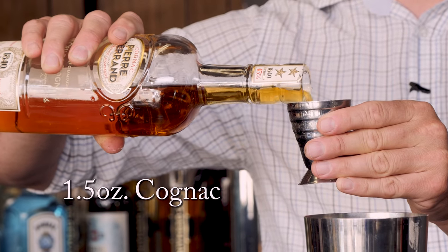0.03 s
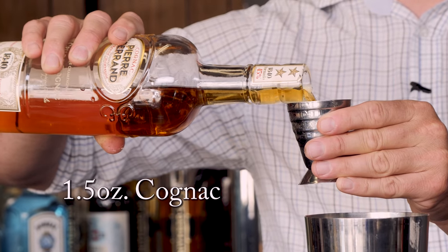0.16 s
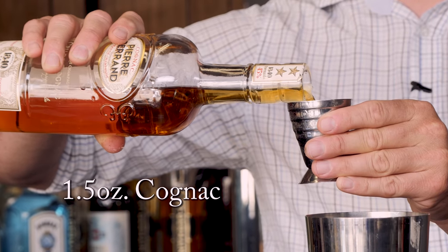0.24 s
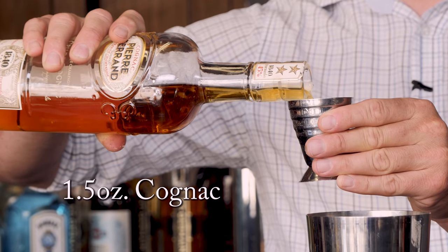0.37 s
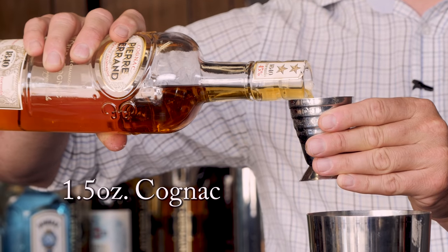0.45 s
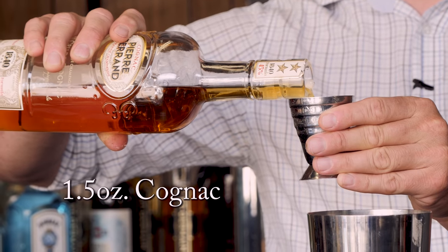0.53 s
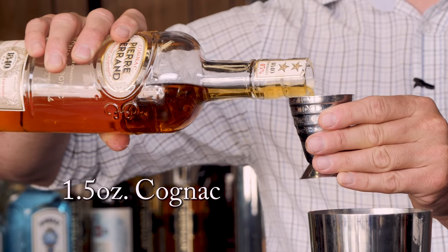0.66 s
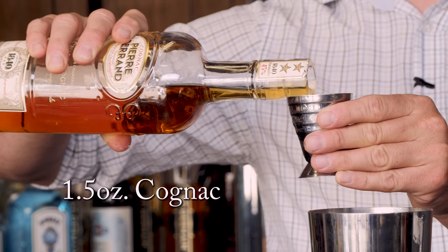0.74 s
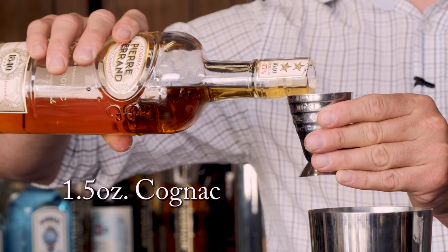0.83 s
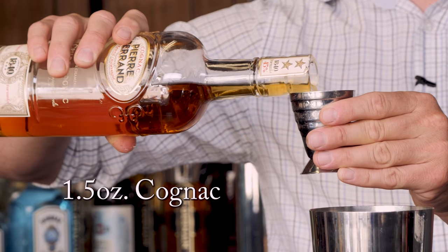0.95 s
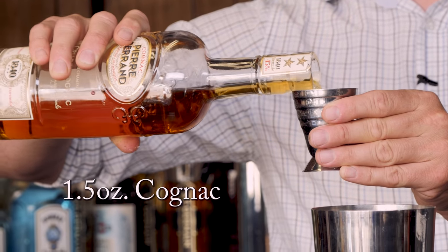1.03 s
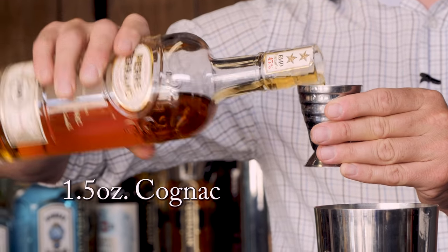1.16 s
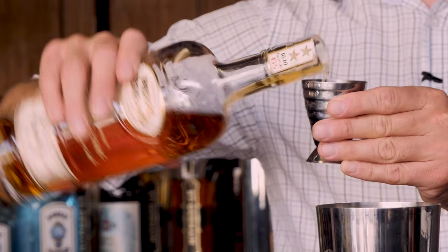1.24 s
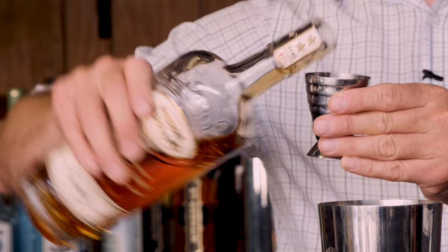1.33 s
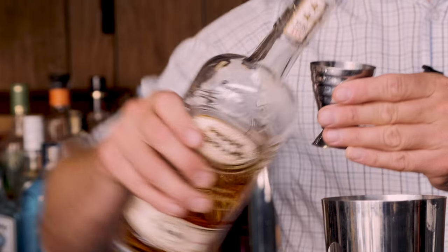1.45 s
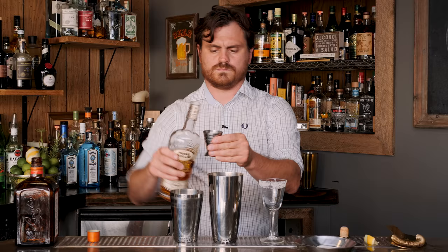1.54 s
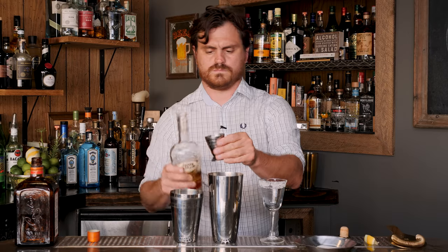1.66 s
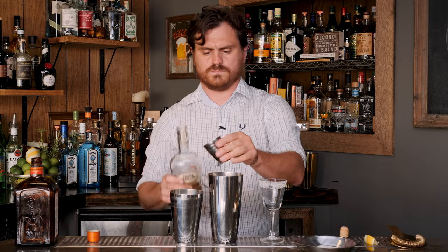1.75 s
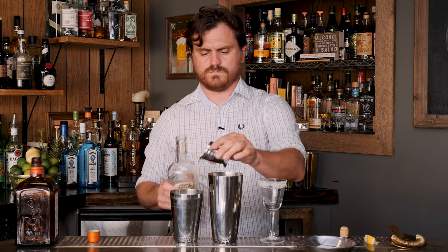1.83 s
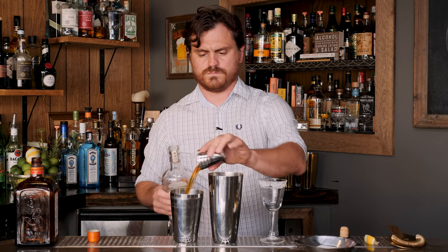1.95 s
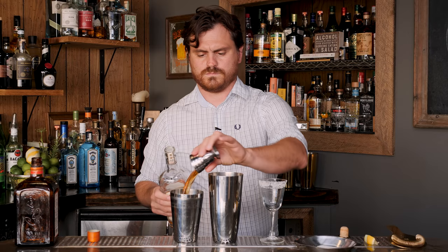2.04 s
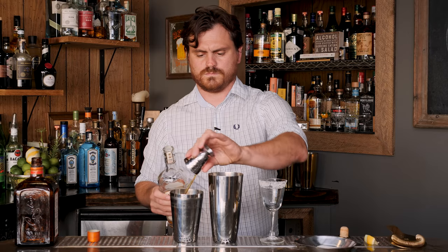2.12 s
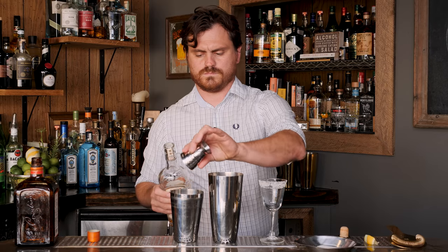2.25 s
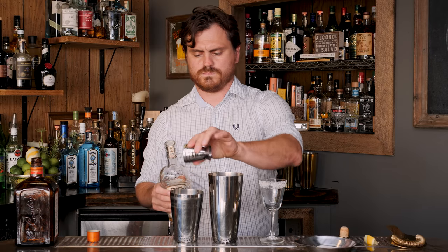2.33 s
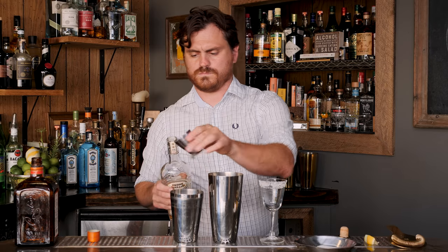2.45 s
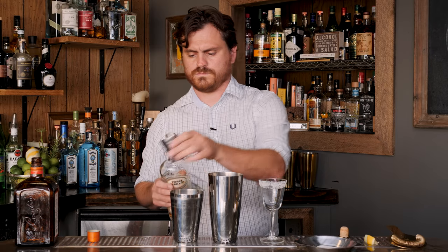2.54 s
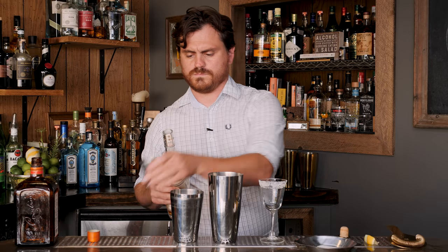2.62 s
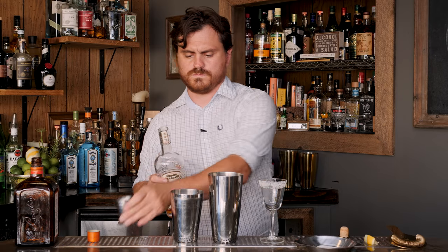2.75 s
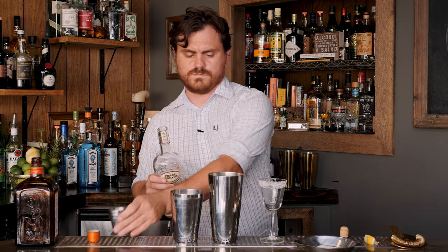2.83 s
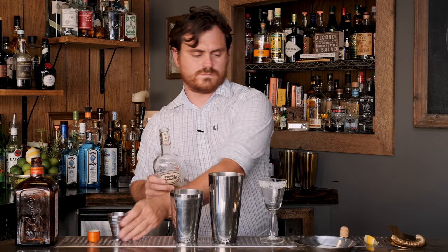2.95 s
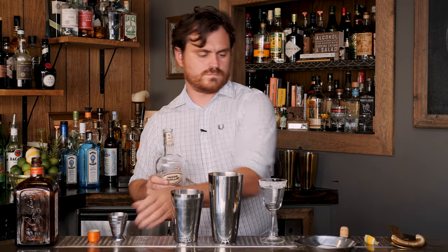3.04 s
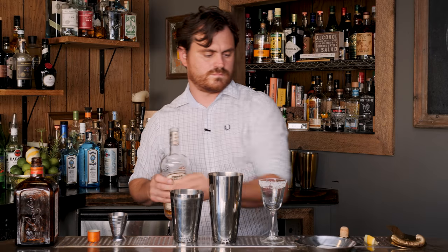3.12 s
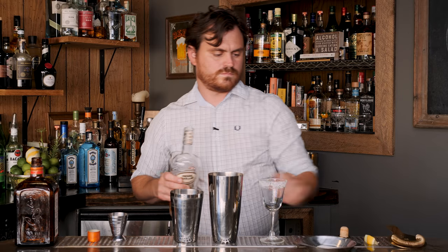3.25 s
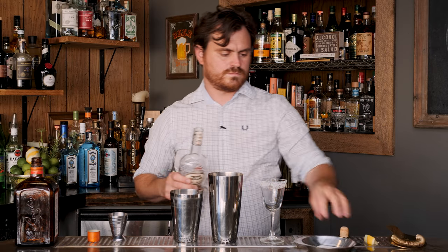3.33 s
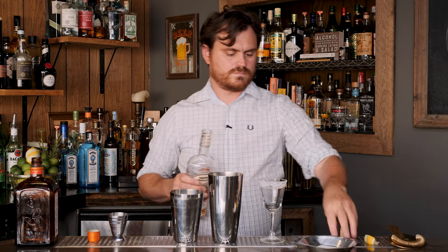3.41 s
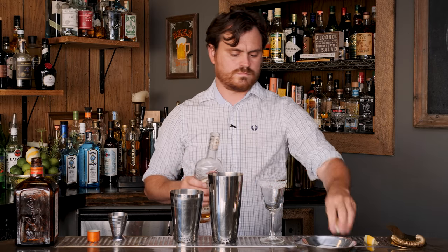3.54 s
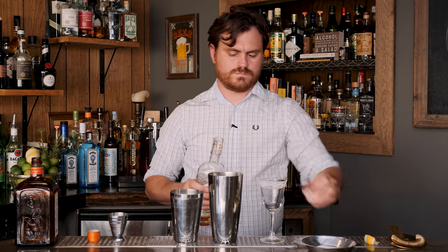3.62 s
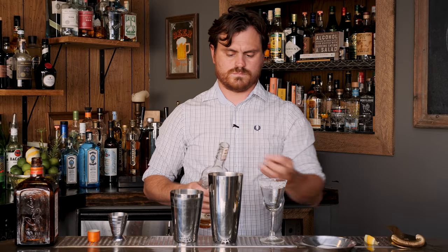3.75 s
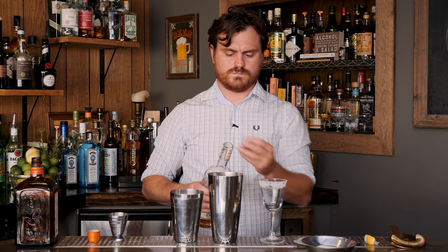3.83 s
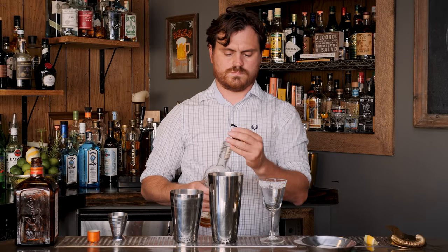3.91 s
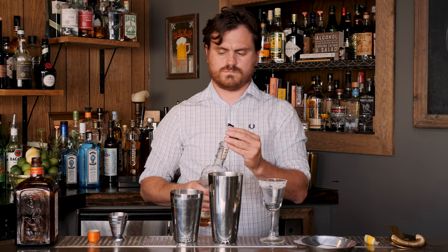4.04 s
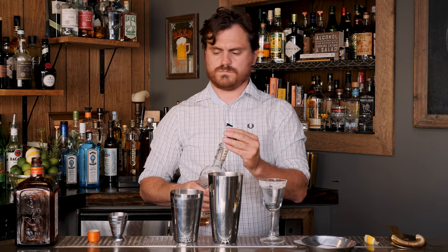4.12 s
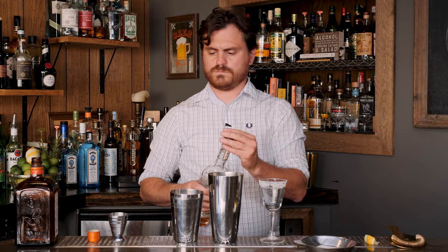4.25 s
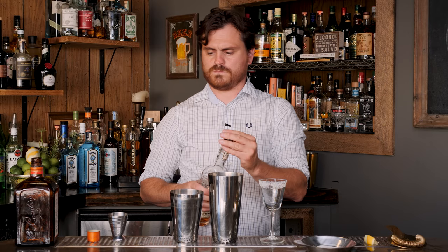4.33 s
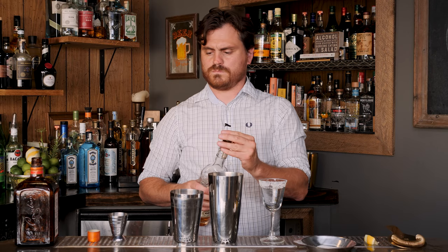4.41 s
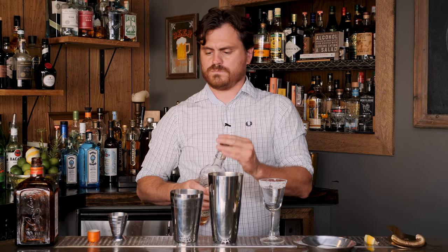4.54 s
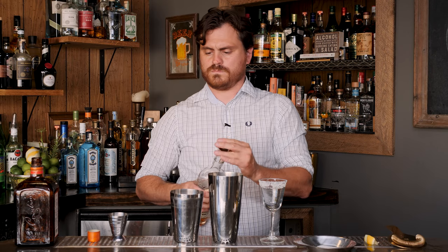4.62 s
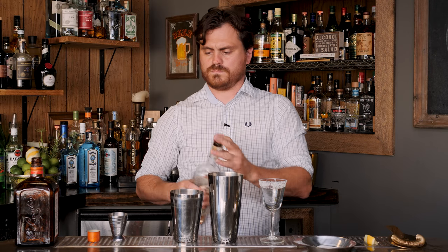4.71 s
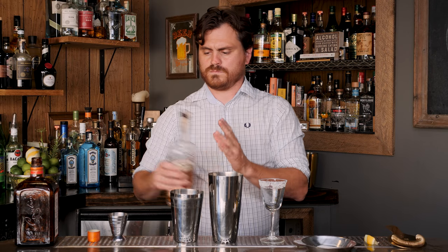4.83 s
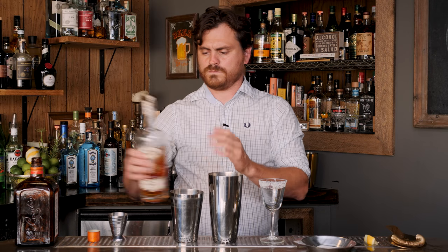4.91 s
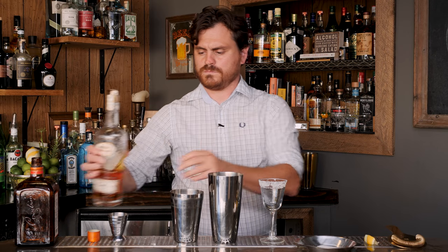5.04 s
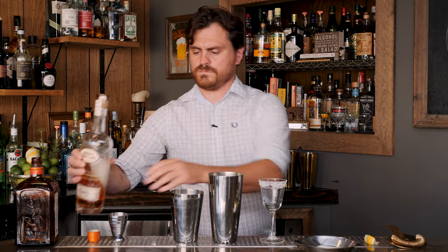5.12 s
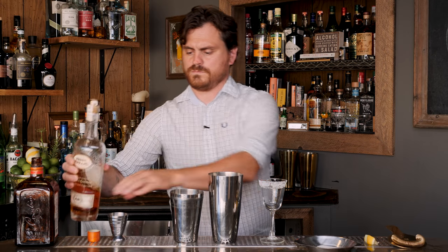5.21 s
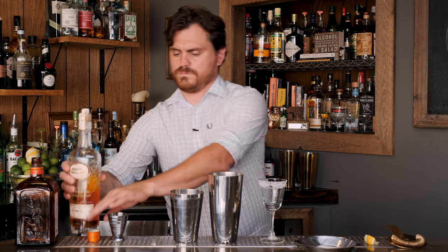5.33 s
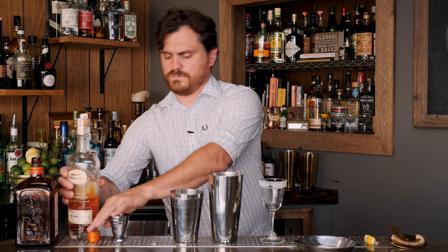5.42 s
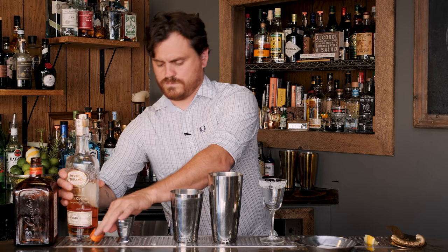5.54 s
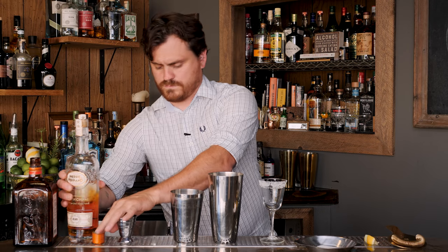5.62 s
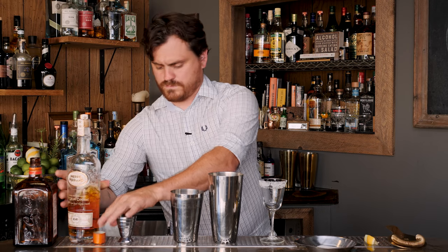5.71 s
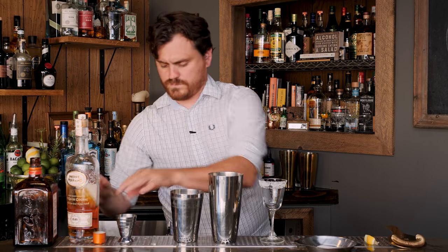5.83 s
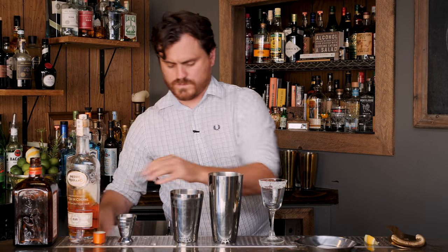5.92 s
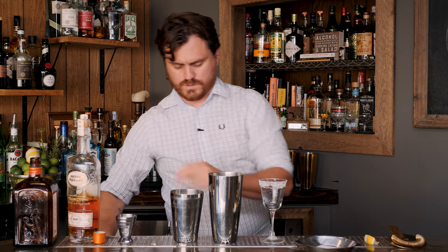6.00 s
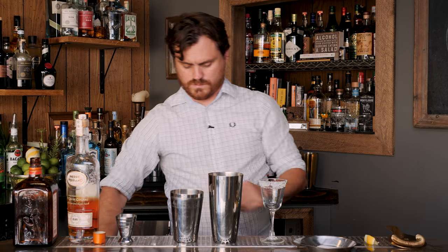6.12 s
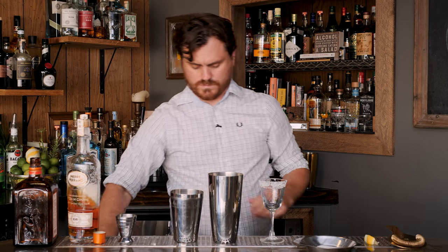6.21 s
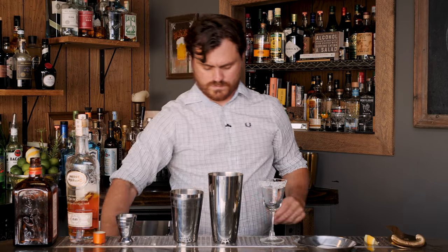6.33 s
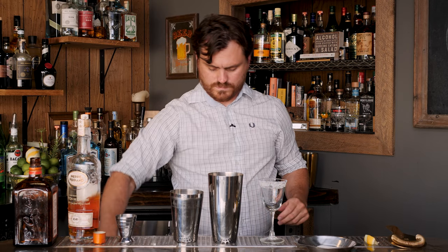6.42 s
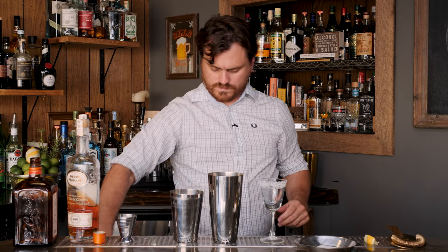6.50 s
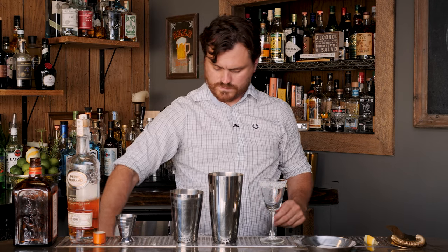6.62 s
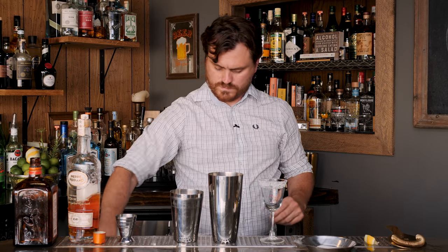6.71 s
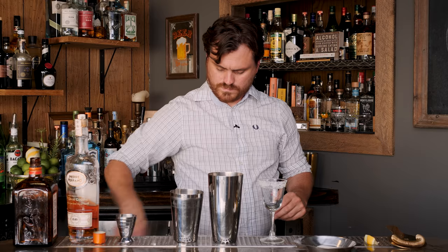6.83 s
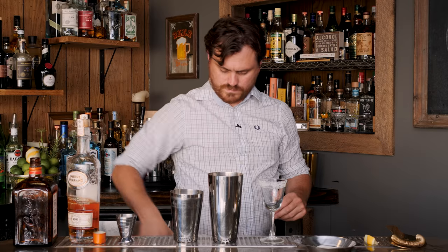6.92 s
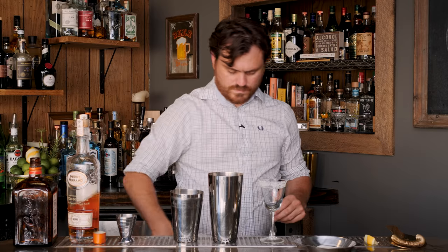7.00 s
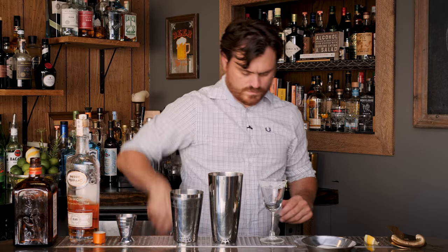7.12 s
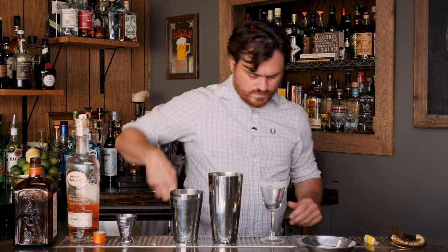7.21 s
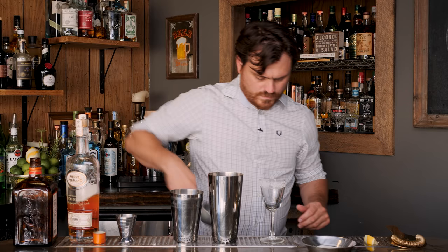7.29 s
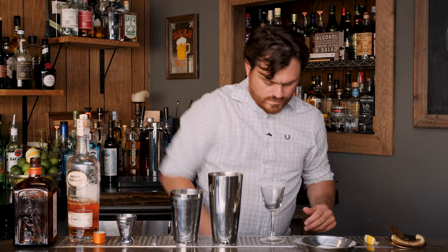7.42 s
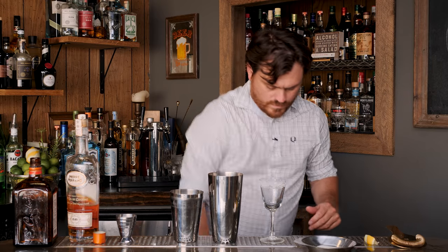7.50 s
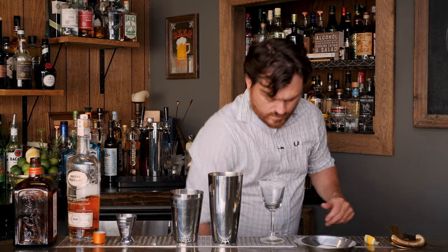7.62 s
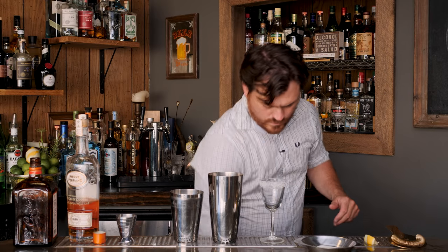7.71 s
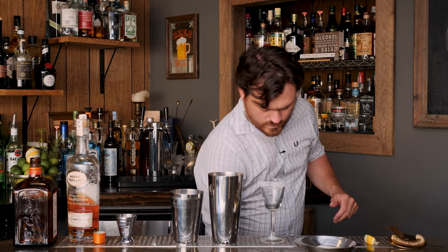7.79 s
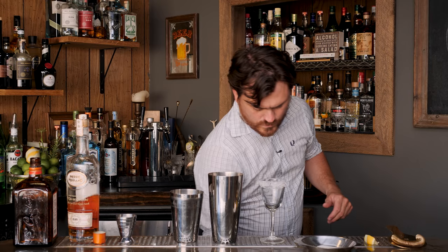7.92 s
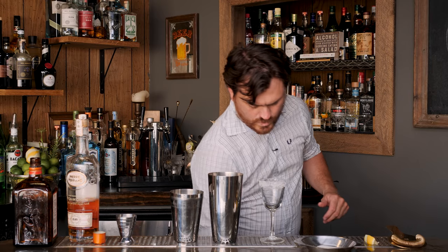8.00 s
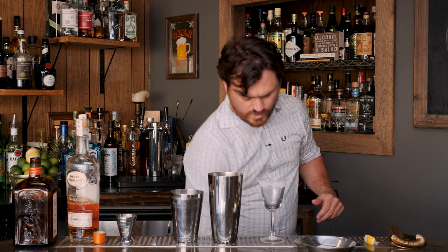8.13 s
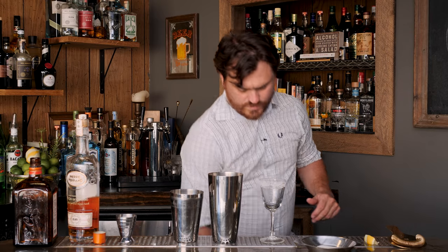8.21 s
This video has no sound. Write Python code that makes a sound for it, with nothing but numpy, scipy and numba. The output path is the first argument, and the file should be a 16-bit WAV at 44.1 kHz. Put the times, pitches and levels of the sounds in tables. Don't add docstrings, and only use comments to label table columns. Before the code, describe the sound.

Close shirt rustle over small liquid and metal sounds at a home bar, ending with a metal scoop clanging and digging noisily in ice cubes.

```python
import sys
import numpy as np
from scipy import signal
from scipy.fft import rfft, irfft
from scipy.io import wavfile
from scipy.ndimage import uniform_filter1d, map_coordinates
from numba import njit

SR = 44100
rng = np.random.default_rng(int(sys.argv[2]) if len(sys.argv) > 2 else 0)


def put_to_file(sound):
    columns = np.atleast_2d(sound).T
    safe = np.clip(columns, -1, 1)
    whole_steps = np.round(safe * 32767)
    wavfile.write(sys.argv[1], SR, whole_steps.astype(np.int16))


def natural_amplitude(level_db):
    exponent = np.asarray(level_db, float) / 20
    return 10 ** exponent


N = 364089
T60_DECAY = np.log(1000)


@njit
def ring(start, hz, t60, size, glide, soft):
    out = np.zeros(N)
    for g in range(len(start)):
        z = size[g] + 0j
        gap = 1.0
        close = np.exp(-hz[g] / (soft * SR))
        turn = np.exp((2j * np.pi * hz[g] - np.log(1000) / t60[g]) / SR)
        n = int(t60[g] * SR)
        bend = np.exp(2j * np.pi * hz[g] * glide / SR / (n + 1))
        first = int(start[g] * SR)
        for i in range(max(first, 0), min(first + n, N)):
            out[i] += z.imag * (1 - gap)
            z = z * turn
            turn = turn * bend
            gap = gap * close
    return out


def band(x, hz, width):
    return signal.lfilter(*signal.iirpeak(hz, hz / width, SR), x)


def body(x, peaks, wet_db):
    return x + natural_amplitude(wet_db) * sum(natural_amplitude(db) * band(x, hz, width) for hz, width, db in peaks)


def burst(s, rise_s, fall_s, db):
    return [(s - rise_s, db - 30), (s, db), (s + fall_s, db - 30)]


def follow(control, colour):
    s, db = np.transpose(control)
    offset_db, steep = np.transpose(colour)
    top = db.max()
    return np.column_stack([s, top + offset_db + np.outer(db - top, steep)])


def shower(table, edges, t60_1k, scatter_db, glide, clump_db, clump_s, count, every):
    edges = np.sqrt(edges)
    s, *levels = np.transpose(table)
    low, span, length = edges[0, 0], edges[-1, 1] - edges[0, 0], s[-1] - s[0]
    share = (edges[:, 1] - edges[:, 0]) / span
    clumps = int(count * length / every)
    even, strong = np.repeat(rng.random((clumps, 2)), every, axis=0).T
    late, pitch, turn, odd, long = rng.random((clumps * every, 5)).T
    when = s[0] + even * length - clump_s * np.log(1 - late)
    root = low + pitch * span
    per_band = np.array([np.interp(when, s, db) for db in levels]) - 10 * np.log10(share)[:, None]
    place = np.interp(root, edges.mean(axis=1), np.arange(len(edges)))
    db = map_coordinates(per_band, [place, np.arange(len(when))], order=1)
    db = db - .09 * np.maximum(root - 88, 0)
    t60 = t60_1k * (.5 + long) * np.sqrt(1000) / root
    luck_db = -scatter_db * np.log(1 - odd) - clump_db * np.log(1 - strong)
    luck = natural_amplitude(np.minimum(luck_db, 16.0))
    crowd = np.mean(luck ** 2) * count * t60 / (4 * T60_DECAY)
    size = natural_amplitude(db) * luck / np.sqrt(crowd)
    return ring(when, root ** 2, t60, size * np.sign(turn - .5), glide, 0.48)


def blows(table, kind, spread_s, gain_db, count):
    s, db, bright_db, peak_hz = np.repeat(table, count, axis=0).T
    low_db, high_db, t60 = kind[0] - bright_db, kind[1] + bright_db, kind[2] - kind[3] * db
    pitch, late, long, sign = rng.random((len(s), 4)).T
    pitch = (np.arange(len(s)) % count + pitch) / count
    hz = (13 + 112 * pitch) ** 2
    place = np.interp(np.log(hz), np.log([450, 2200, 8000, 16000]), [0, 1, 2, 3])
    treble = high_db * np.minimum(place - 1, 1) - 7.0 * np.maximum(place - 2, 0)
    colour = np.where(place < 1, low_db * (1 - place), treble)
    near = np.exp(-(np.log(hz / peak_hz) / 0.066) ** 2)
    t60 = np.clip(t60, .004, .4) * (0.18 + long + 0.2 * near) * (2000 / hz) ** 0.35
    size = natural_amplitude(db + colour + 11.0 * near + gain_db) * np.sign(sign - .5)
    when = s + spread_s * late ** 3 * (1 - .7 * pitch)
    return ring(when, hz, t60, size, 0., 0.13)


def struck(hits, modes, gain_db, longest_s, mix_db=2.2, wander=0.):
    s, db = np.repeat(hits, len(modes), axis=0).T
    hz, mode_db, t60 = np.tile(modes, (len(hits), 1)).T
    mix, split, shift = rng.standard_normal((len(s), 3)).T
    hz = hz * (1 + wander * shift)
    size = natural_amplitude(db + mode_db + mix_db * mix + gain_db)
    t60 = np.clip(t60, .02, longest_s)
    twin = ring(s, hz * (1 + 0.0118 * split), 1.24 * t60, 0.5 * size, 0., 3.0)
    return ring(s, hz, t60, size, 0., 3.0) + twin


def notes(table, cycles, glide, soft, ratios):
    s, db, hz = np.transpose(table)
    return sum(ring(s, hz * r, cycles / (hz * r), natural_amplitude(db) / r ** 0.62, glide, soft) for r in ratios)


def walls(x, t60, wet_db):
    t = np.arange(SR // 2) / SR
    dull = signal.lfilter([1], [1, -.45], rng.standard_normal(len(t)))
    tail = dull * np.exp(-T60_DECAY * t / t60) * np.clip(t / 0.0082, 0, 1)
    tail = tail / np.sqrt(np.sum(tail ** 2))
    return x + natural_amplitude(wet_db) * signal.fftconvolve(x, tail)[:N]


# [pitch_hz, level_db per Hz]
ROOM_SPECTRUM = [(30, -18), (130, 1), (363, -4), (1070, -13.5), (2500, -19.5), (5430, -27.5), (11300, -29),
                 (16000, -38)]


def room_tone():
    hz, db = np.transpose(ROOM_SPECTRUM)
    gain = natural_amplitude(np.interp(np.log(np.fft.rfftfreq(N, 1 / SR) + 1), np.log(hz), db))
    air = irfft(rfft(rng.standard_normal(N)) * gain, N)
    room_db = -62.5
    return air * natural_amplitude(room_db - 5.5) / air.std()


# [start_s, length_s, from_hz, to_hz, level_db]
BIRD_WHISTLES = [(0, 0.29, 2990, 2740, -72), (0.034, 0.078, 4000, 3500, -71),
                 (0.097, 0.048, 3190, 3150, -61), (0.497, 0.29, 2830, 2980, -74),
                 (0.757, 0.086, 2900, 2600, -71), (0.875, .08, 4000, 3450, -74),
                 (0.914, 0.08, 3160, 3040, -68), (1.101, 0.32, 2900, 2930, -74),
                 (1.357, 0.082, 2860, 2580, -71), (1.712, 0.38, 2940, 2970, -77),
                 (2.454, 0.45, 2910, 3010, -75), (3.96, .12, 4000, 2950, -67.5),
                 (4.345, 0.24, 3150, 2990, -70), (4.775, 0.17, 4270, 3100, -71),
                 (4.656, 0.3, 11400, 11000, -80), (4.703, 0.17, 6200, 5900, -78),
                 (5.15, .12, 3150, 3100, -65.5), (6.058, 0.32, 3030, 3050, -74)]


def birds():
    out = np.zeros(N)
    for start, length, from_hz, to_hz, db in BIRD_WHISTLES:
        hoarse_hz = 38 + .04 * abs(to_hz - from_hz) / length
        u = np.linspace(0, 1, int(length * SR))
        slow = uniform_filter1d(rng.standard_normal((2, N // 8)), size=160)
        waver, swell = 11.0 * slow[:, :len(u)]
        hz = from_hz + (to_hz - from_hz) * u + hoarse_hz * waver
        fade = np.clip(18.0 * u, 0, 1) * np.clip(3.0 * (1 - u), 0, 1)
        shape = fade * natural_amplitude(db + 1 + 3.4 * swell)
        out[int(start * SR):][:len(u)] += shape * np.sin(2 * np.pi * np.cumsum(hz) / SR)
    return out


# [start_s, level_db]
SHIRT_EFFORT = [(1.0, -74), (1.95, -58), (2.12, -67), (2.5, -76), (2.72, -53), (2.95, -47), (3.3, -56),
                (3.5, -62), (3.73, -57), (4.2, -70), (4.55, -60), (5.05, -62), (5.33, -47), (5.72, -47),
                (5.77, -58), (5.85, -50), (5.97, -56), (7.56, -56)]
# [from_hz, to_hz]
SHIRT_BANDS = [(36, 400), (400, 2500), (2500, 15300)]
# [level_db re effort at its top, steepness in dB per dB of effort]
SHIRT_BAND_LEVELS = [(1.5, 1.05), (-7.5, .95), (-13.5, .85)]
# [start_s, level_db, pitch_hz]
DULL_KNOCKS = [(6.682, -30, 140), (0.939, -51, 191), (1.046, -43, 275), (7.57, -20, 140), (1.242, -36, 318),
               (1.29, -39.5, 307), (1.466, -40, 363), (1.665, -33.5, 336), (2.05, -44, 90),
               (2.066, -46, 783), (2.86, -34, 95), (3.022, -26, 156), (3.26, -36, 75), (3.39, -36, 85),
               (3.679, -41, 300), (3.743, -31, 400), (3.79, -42, 80), (4.248, -39, 190), (4.35, -34, 480),
               (4.468, -38, 420), (7.04, -29, 190), (4.568, -38, 363), (5.028, -45, 330), (5.11, -43, 90),
               (5.31, -33, 150), (5.366, -19, 150), (5.374, -17, 400), (5.817, -35, 480), (6.07, -33, 75),
               (6.392, -34, 105), (7.12, -27, 200), (7.16, -28, 180), (7.2, -27, 160), (7.24, -32, 140),
               (6.78, -33, 200), (6.935, -29, 200), (4.505, -42, 110), (4.528, -44, 400), (1.15, -50, 230),
               (2.75, -40, 200), (7.61, -24, 200), (4.05, -48, 60), (6.14, -47, 900), (6.25, -42, 780),
               (6.285, -41, 850), (3.12, -40, 500), (8.22, -19, 400)]


def shirt():
    effort = follow(SHIRT_EFFORT, SHIRT_BAND_LEVELS)
    rustle = shower(effort, SHIRT_BANDS, 0.027, 2.1, 0., 1.03, .02, count=9000, every=30)
    bumps = notes(DULL_KNOCKS, 5.5, 0., .4, [1, 2.3, 3.7])
    return natural_amplitude(-1.5) * rustle + natural_amplitude(1.5) * bumps


# [start_s, level_db, pitch_hz]
DRIPS = [(0.2099, -54, 2140), (0.474, -63, 2260), (0.8155, -58, 2090), (1.716, -58, 1740),
         (1.722, -57, 1380), (1.745, -59, 1390), (1.12, -63, 2250), (1.26, -63, 2080), (1.8048, -49, 2650),
         (1.8582, -51, 2680), (1.9589, -56, 2700)]
# [start_s, level_db, pitch_hz]
SMALL_TICKS = [(0.4125, -59, 5030), (1.9886, -52, 3330), (2.4778, -50, 4230), (2.677, -53, 3900),
               (3.2544, -49, 4640), (3.268, -51, 4900), (3.284, -45.5, 4940), (3.298, -48, 4500),
               (3.3568, -53, 4910), (3.3856, -48, 4800), (4.519, -52, 3800), (4.519, -53, 2400),
               (4.533, -42, 4100), (4.674, -52, 4500), (5.766, -50, 6700), (2.003, -56, 3300),
               (2.044, -56, 3800), (1.775, -60, 5500), (1.66, -58, 5500)]


def drips():
    plinks = notes(DRIPS, 80.0, .08, 0.83, [1])
    return plinks + notes(SMALL_TICKS, 60.0, 0., 6.0, [.86, 1, 1.12])


# start_s, rise_s, fall_s, level_db
BOTTLE_SLOSH = (1.555, .07, .1, -50)
# [level_db, steepness in dB per dB of flow]
SLOSH_BAND_LEVELS = [(-40, .6), (0, 1.05), (-10, .8)]
# [start_s, level_db]
STREAM_FLOW = [
    (2.05, -80),
    (2.072, -62),
    (2.095, -56),
    (2.115, -46),
    (2.22, -49),
    (2.25, -54),
    (2.39, -55),
    (2.41, -61),
    (2.5, -76),
]
# [from_hz, to_hz]
SPLASH_BANDS = [(500, 1300), (1700, 3800), (3800, 15000)]
# [level_db, steepness in dB per dB of flow]
SPLASH_BAND_LEVELS = [(-21, .2), (-1, 1.05), (-14, .6)]
# [pitch_hz, width_hz, level_db]
SHAKER_RESONANCES = [(793, 160, 10), (2000, 74, -13), (2310, 130, -4), (3150, 70, -1)]
# [start_s, level_db, pitch_hz]
GULPS = [(1.529, -34.5, 1370), (1.559, -38, 1410), (2.074, -42, 760), (2.145, -48, 760), (2.28, -48, 950),
         (2.213, -41.5, 850), (2.249, -47, 850), (2.332, -48, 800), (2.387, -39, 815), (2.407, -47, 800),
         (2.445, -52, 760), (4.517, -40.5, 1350), (4.603, -38, 1440)]
# [start_s, level_db, pitch_hz]
LOUD_BUBBLES = [(1.5415, -37, 1570), (1.539, -48, 4400), (1.551, -41, 2520), (1.556, -50, 6500),
                (1.559, -48, 3300), (1.583, -45, 2620), (1.587, -49, 3350), (1.5852, -39, 1710),
                (2.117, -40, 1400), (2.117, -37, 3100), (2.141, -32, 1280), (2.141, -33, 2300),
                (2.143, -38, 3200), (2.157, -39, 1650), (2.19, -39, 3150), (2.195, -42, 1350),
                (2.218, -38, 1980), (2.24, -42, 2650), (2.27, -43, 3200), (2.322, -44, 4400),
                (2.333, -45, 3400), (2.358, -40, 2300), (2.444, -45, 2400), (2.448, -46, 1950),
                (2.1031, -31.5, 3140), (2.1151, -36, 2310), (2.1276, -26, 2280), (2.14, -28, 1584),
                (2.1789, -28, 2310), (2.186, -33, 2300), (2.2169, -34.5, 2320), (2.284, -45, 2460),
                (2.3226, -43, 2260), (2.357, -31.5, 3330), (2.3744, -38, 1960), (2.4049, -40, 2310)]
# [pitch_hz, level_db, t60_s]
BOTTLE_MODES = [(1435, -9.5, 0.32), (1780, -10, 0.22), (2600, -9, 0.11), (4400, -12, 0.092),
                (3300, -18, .1), (2150, -20, .15), (5400, -20, .08)]
# [start_s, level_db]
BOTTLE_TAPS = [
    (1.53, -52),
    (1.555, -44),
    (1.587, -56),
    (1.72, -62),
]


def splash():
    slosh = follow(burst(*BOTTLE_SLOSH), SLOSH_BAND_LEVELS)
    stream = follow(STREAM_FLOW, SPLASH_BAND_LEVELS)
    fizz = sum(shower(flow, SPLASH_BANDS, 0.031, 5.4, 0.2, 2.5, .004, count=6000, every=8)
               for flow in (slosh, stream))
    big = notes(GULPS, 38.0, 0.04, 0.88, [1]) + notes(LOUD_BUBBLES, 47.0, .06, 0.55, [1])
    glass = struck(BOTTLE_TAPS, BOTTLE_MODES, -1, .33)
    return body(fizz, SHAKER_RESONANCES, -3.5) + big + glass


# [start_s, level_db, pitch_hz]
CORK_POPS = [
    (4.6258, -10, 4250),
    (4.634, -31, 4200),
]


def cork():
    return notes(CORK_POPS, 50.0, 0., 2.5, [.95, 1, 1.04, 1.15]) * natural_amplitude(-9)


# [start_s, rise_s, fall_s, level_db]
MAT_SCRAPES = [
    (2.974, .006, .24, -42),
    (3.557, .008, .07, -46),
    (5.487, .003, .28, -39),
]
# [from_hz, to_hz]
SCRAPE_BANDS = [(400, 1500), (1500, 5000), (5000, 15500)]
# [level_db, steepness in dB per dB]
SCRAPE_BAND_LEVELS = [(-4, .9), (0, .95), (-5, .95)]
# [start_s, level_db, brightness_db, pitch_hz]
BAR_BLOWS = [(2.0643, -33, -1, 3900), (2.9718, -30, -1, 2570), (2.986, -36, 3, 7200),
             (3.0015, -28, -2, 2600), (3.0637, -33, 5, 7200), (3.547, -42, 6, 2300), (3.556, -39, 5, 2200),
             (3.043, -42, 3, 4300), (5.44, -48, 2, 3500), (6.155, -50, 3, 4000), (4.6255, -27, 3, 4350),
             (5.1647, -46.5, 2, 3110), (5.3502, -44, 4, 3600), (5.486, -13.5, 0, 4200),
             (5.541, -42, 1, 2480), (5.5633, -33, 3, 2550), (5.6179, -35, 0, 2400), (5.648, -35, 2, 2700),
             (5.672, -31, 8, 6750), (5.7219, -37, 2, 1270)]
# low_db, high_db, t60_s at 0 dB, s longer per dB softer
BAR_BLOW_KIND = (-7, -5, .04, .0003)
# [pitch_hz, level_db, t60_s]
JIGGER_MODES = [(2200, -4, .12), (5500, -3, .15), (6900, -5, .1), (9600, -8, .08), (12100, -4, .15)]
# [start_s, level_db]
JIGGER_RINGS = [
    (3.002, -46),
    (3.556, -48),
]


def set_down():
    scrape = sum(shower(follow(burst(*one), SCRAPE_BAND_LEVELS), SCRAPE_BANDS, 0.014, 2.5, 0., .6, .005,
                        count=8000, every=30) for one in MAT_SCRAPES)
    scrape = body(natural_amplitude(-4.5) * scrape, [(6730, 1300, 0)], 4.7)
    knocks = blows(BAR_BLOWS, BAR_BLOW_KIND, .008, -18.5, count=100)
    return scrape + knocks + struck(JIGGER_RINGS, JIGGER_MODES, 0.5, .2)


# [pitch_hz, width_hz, level_db]
BOWL_MODES = [(1017, 170, 0), (1810, 58, -16), (2140, 51, -3), (2780, 14, -14), (3220, 29, -16),
              (4020, 61, -0.5), (4550, 58, -18), (4610, 97, -19), (5940, 57, -5)]
# [pitch_hz, level_db, t60_s]
SCOOP_MODES = [(1370, -14.5, .3), (2003, -16, .23), (2363, -5, 0.19), (3488, -11, .22), (4290, -12, .25),
               (4657, -13, 0.24), (5938, -14, 0.17), (6315, -17, 0.18), (7385, -13, .2), (7725, -4, 0.05),
               (3989, -16, .25), (5200, -16, .15), (10260, -28, .2), (12070, -20, .15)]
# [start_s, level_db]
SCOOP_BLOWS = [
    (7.0434, -30),
    (7.0743, -36),
    (7.1167, -6.5),
    (7.145, -14),
    (7.1904, -25),
]
# [pitch_hz, level_db, t60_s]
RIM_MODES = [(1270, -8, 0.29), (1840, -4, .15), (2375, -11, 0.23), (2756, -8, 0.25), (3450, -12, 0.23),
             (4020, -9, 0.13), (4300, -12, 0.16), (4620, -12, .2), (5200, -12, 0.14)]
# [start_s, level_db]
RIM_BLOWS = [(6.14, -50), (6.2, -48), (6.25, -45), (6.29, -47), (6.88, -32), (6.935, -30), (6.4093, -42),
             (6.435, -35), (6.507, -26), (6.5596, -30.5), (6.681, -26), (6.781, -24), (6.8543, -32)]
# [pitch_hz, level_db, t60_s]
EDGE_MODES = [(1114, -4, .11), (1750, -8, .19), (3144, -10, .12), (3860, -8, .25), (5276, -8, .13),
              (5663, -8, .13), (6309, -10, .16), (7311, -7, .18), (8204, -9, .16), (9300, -9, .15),
              (10190, -14, .15), (10610, -14, .15), (11500, -13, .15), (13000, -15, .12)]
# [start_s, level_db]
EDGE_BLOWS = [(6.428, -44), (6.508, -26), (6.545, -34), (6.6815, -22), (6.7815, -28), (6.854, -36),
              (6.885, -36), (6.9965, -36), (7.0405, -30), (7.0735, -30), (7.117, -15), (7.18, -23),
              (7.57, -16)]


def scoop():
    whole = struck(SCOOP_BLOWS, SCOOP_MODES, -10, 0.3, mix_db=1.2)
    rim = struck(RIM_BLOWS, RIM_MODES, -12.5, .27, mix_db=3.5, wander=.015)
    edge = struck(EDGE_BLOWS, EDGE_MODES, -15, .15, mix_db=4.5, wander=.025)
    return whole + rim + edge


# [from_hz, to_hz]
ICE_BANDS = [(118, 400), (400, 2500), (2500, 6000), (6000, 15800)]
# [start_s, level_db]
STIR_FORCE = [(6.2, -63), (6.506, -57), (6.51, -39), (6.56, -44), (6.64, -60), (6.679, -52), (6.683, -38),
              (6.72, -46), (6.778, -52), (6.783, -43), (6.845, -50), (6.87, -42), (6.935, -40), (6.99, -48),
              (7.098, -52), (7.113, -46)]
# [start_s, level_db]
TIP_FORCE = [
    (7.12, -24),
    (7.175, -36),
    (7.2, -33),
    (7.225, -45),
    (7.28, -59),
    (7.41, -58),
    (7.56, -65),
]
# [level_db, steepness in dB per dB of force]
STIR_BAND_LEVELS = [(-5, .8), (-1, .95), (-2.5, .95), (-2.5, 1.1)]
# [start_s, level_db]
DIG_FORCE = [(7.57, -19), (7.578, -22), (7.605, -23), (7.645, -32), (7.67, -26), (7.716, -21), (7.768, -17),
             (7.84, -23), (7.89, -28), (7.93, -25), (8.0, -36), (8.18, -33), (8.256, -27)]
# [level_db, steepness in dB per dB of force]
DIG_BAND_LEVELS = [(-4.5, 1.0), (1.0, .9), (-3.5, 1.1), (-5, 1.5)]
# [start_s, level_db, brightness_db, pitch_hz]
CUBE_KNOCKS = [(6.5081, -29, 5, 4600), (6.5128, -29, 0, 1100), (6.54, -35, 4, 4300), (6.6812, -17, 5, 4620),
               (6.782, -24, 3, 2770), (6.8538, -32.5, -7, 1270), (6.885, -36, 3, 1000),
               (6.933, -21, -14, 510), (6.9965, -34, 5, 4000), (7.0015, -28, -3, 966),
               (7.0428, -23, 1, 820), (7.074, -25, 2, 1680), (7.1035, -8, -9, 633), (7.1159, -3, 4, 760),
               (7.119, -9, -8, 780), (7.1795, -20, 8, 7400), (7.1907, -13, 3, 1345), (7.2, -21, 5, 3900),
               (7.5688, -11.5, 3, 3570), (7.5766, -2, 7, 3400), (7.587, -12, 6, 2500),
               (7.5984, -11, 6, 2500), (7.624, -21, 10, 12000), (7.656, -17, 4, 2310),
               (7.6686, -17, 3, 894), (7.684, -19, 8, 5900), (7.7054, -15, -8, 876), (7.7441, -11, 0, 947),
               (7.763, -5, 2, 2500), (7.79, -12, 3, 1100), (7.807, -17, 8, 11000), (7.822, -14, -2, 1300),
               (7.848, -19, 8, 9000), (7.8618, 1.5, 0, 1300), (7.925, -12, -2, 1340),
               (7.935, -21, 9, 10500), (7.9689, -20, 1, 3800), (8.005, -26, -3, 2000),
               (8.0475, -19, -9, 870), (8.0667, -24, -2, 3000), (8.135, -24, -6, 500),
               (8.1579, -24, -2, 3600), (8.1962, -16, -8, 1000), (8.2158, -8, -1, 800),
               (8.22, -13, -10, 560), (8.244, -20, 0, 2100), (8.247, -24, 12, 14000),
               (8.2494, -13, -6, 910)]
# low_db, high_db, t60_s at 0 dB, s longer per dB softer
CUBE_BLOW_KIND = (-10, -10, .038, .0017)
# [pitch_hz, width_hz, level_db]
BIN_RESONANCES = [(163, 86, -1.5), (600, 50, -4), (898, 140, -2.5), (1142, 31, -6), (1310, 17, -8.5),
                  (1600, 17, -15), (2100, 240, -11.5), (3560, 49, -12), (4020, 55, 1.5)]


def ice():
    stir = follow(STIR_FORCE + TIP_FORCE, STIR_BAND_LEVELS)
    dig = follow(DIG_FORCE, DIG_BAND_LEVELS)
    scooped, dug = (shower(force, ICE_BANDS, .06, 2.0, 0., 1.2, .008, count=13000, every=26)
                    for force in (stir, dig))
    knocks = blows(CUBE_KNOCKS, CUBE_BLOW_KIND, .012, -21, count=120)
    lifted = np.arange(N) < 7.5 * SR
    in_bowl = body(natural_amplitude(-3.5) * scooped + lifted * knocks, BOWL_MODES, 1.7)
    in_bin = body(natural_amplitude(-5.5) * dug + ~lifted * knocks, BIN_RESONANCES, 0.81)
    return in_bowl + in_bin


def scene():
    far = birds() + drips() + splash() + cork() + set_down() + scoop() + ice()
    far = signal.lfilter(*signal.butter(2, 110, "high", fs=SR), far)
    return (walls(far, 0.23, -15.5) + shirt() + room_tone())[None]


def roll_off(x):
    return signal.sosfilt(signal.butter(12, 16450, fs=SR, output="sos"), x)


def record(dry):
    thin = signal.lfilter(*signal.butter(1, 45, "high", fs=SR), dry)
    mix = np.tanh(1.107 * thin) / 1.128
    return roll_off(mix)


dry = scene()
out = record(dry)
put_to_file(out)
```